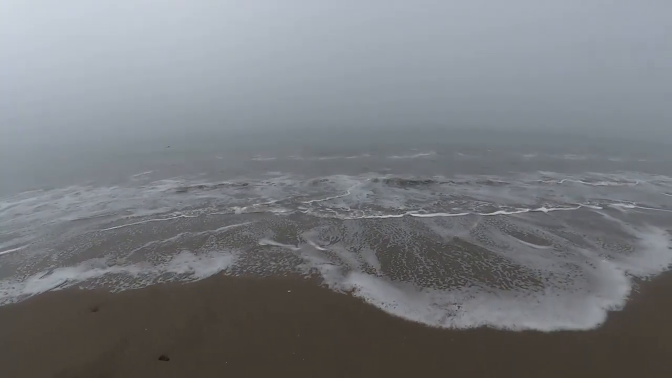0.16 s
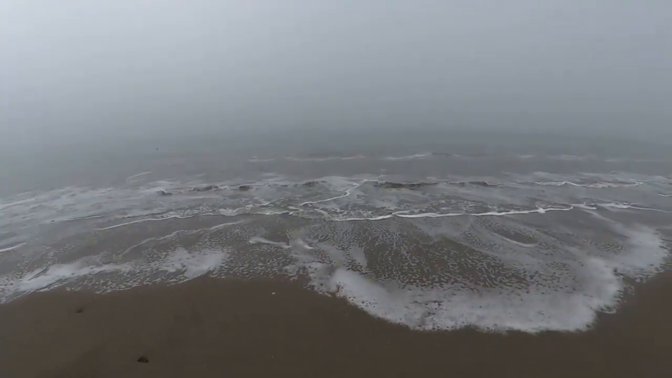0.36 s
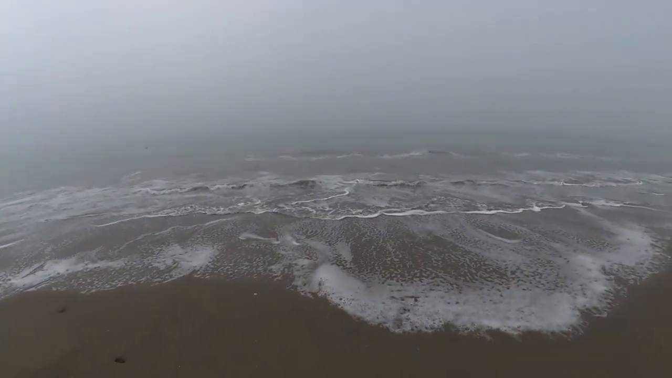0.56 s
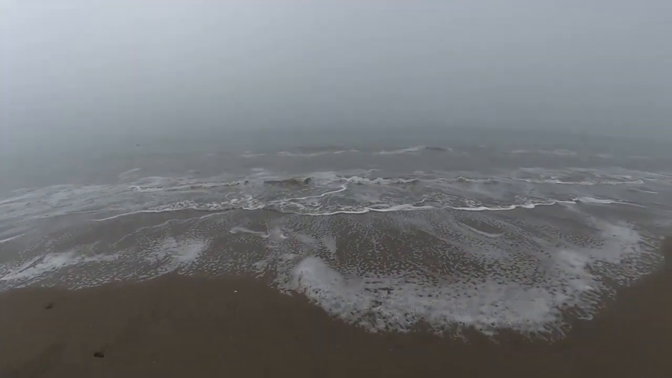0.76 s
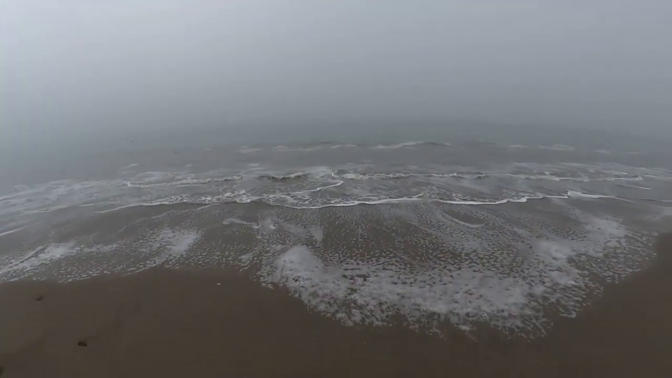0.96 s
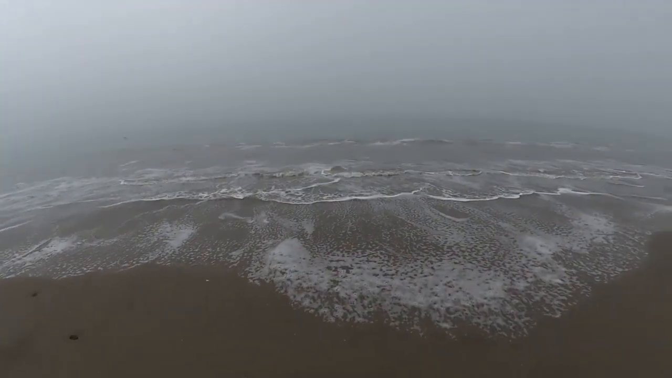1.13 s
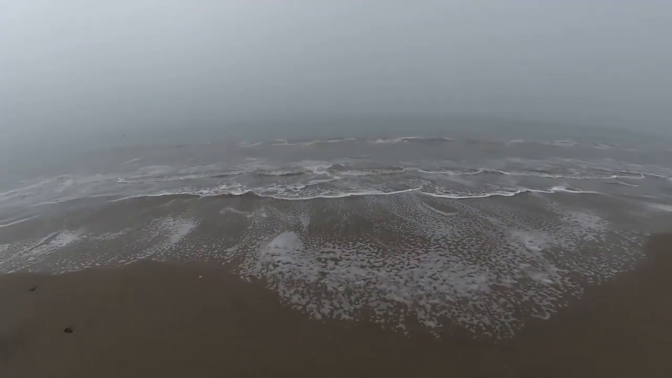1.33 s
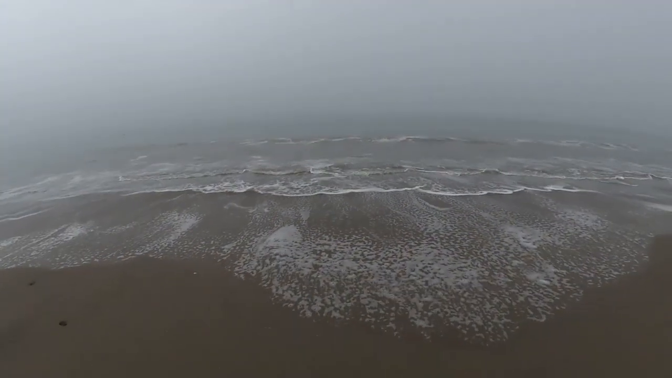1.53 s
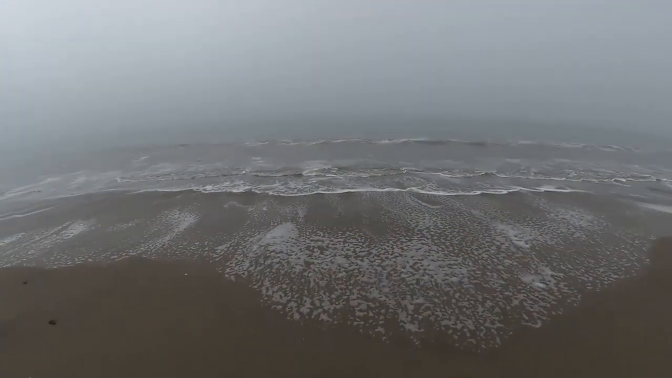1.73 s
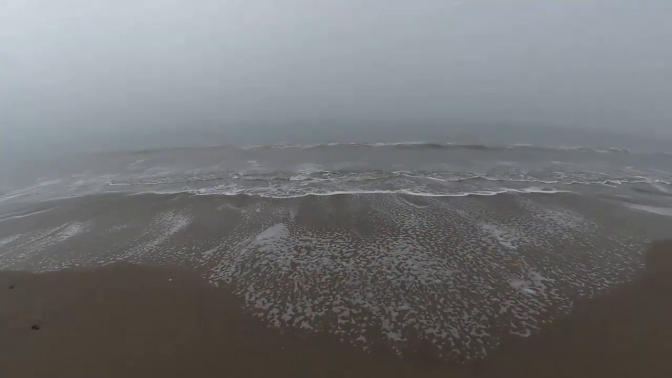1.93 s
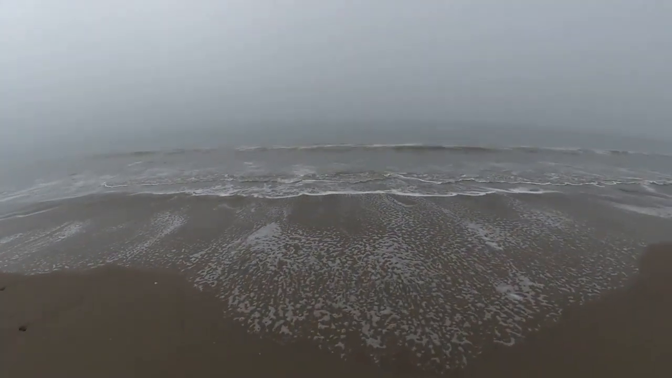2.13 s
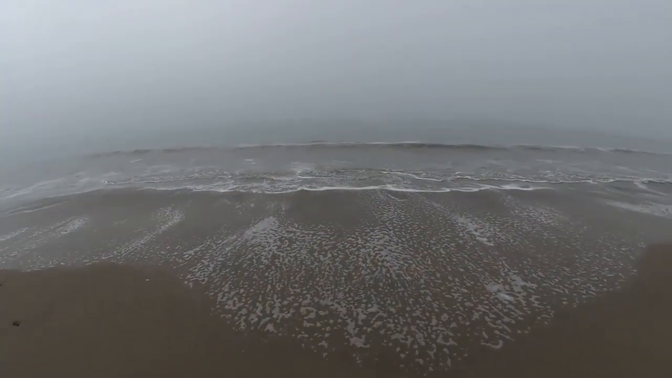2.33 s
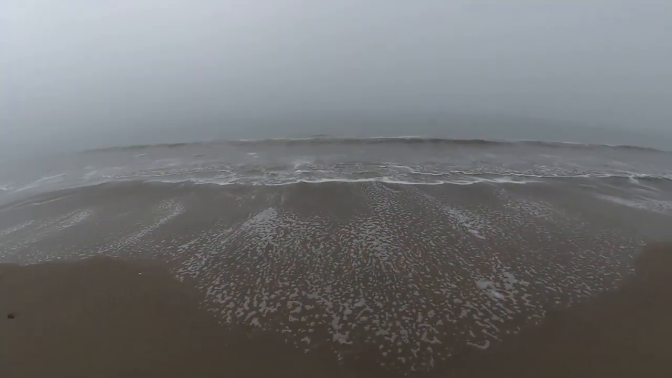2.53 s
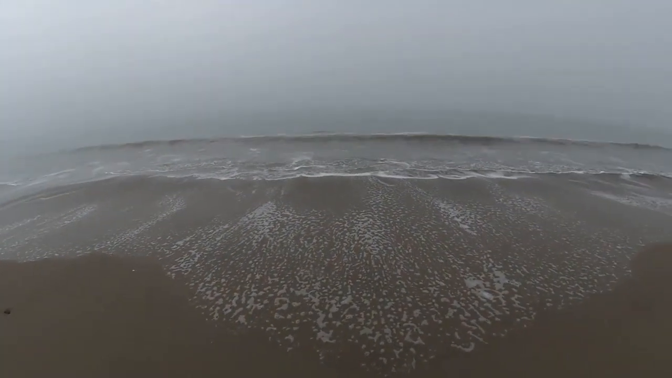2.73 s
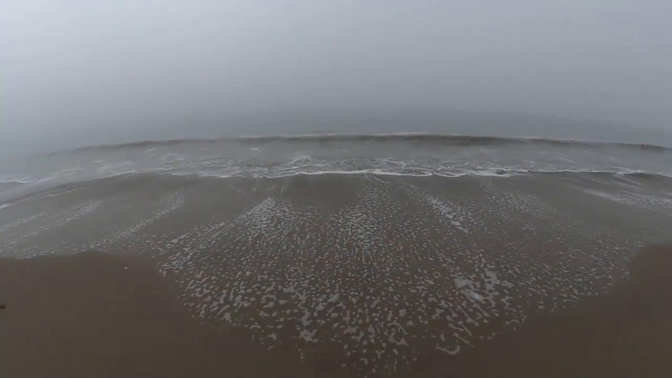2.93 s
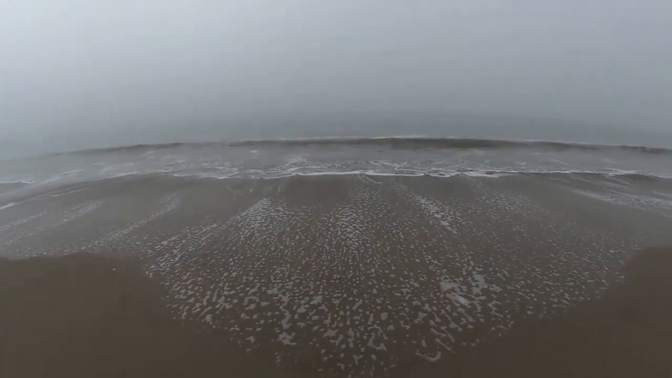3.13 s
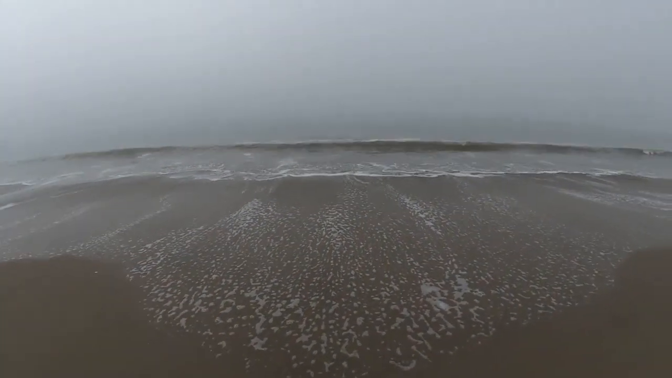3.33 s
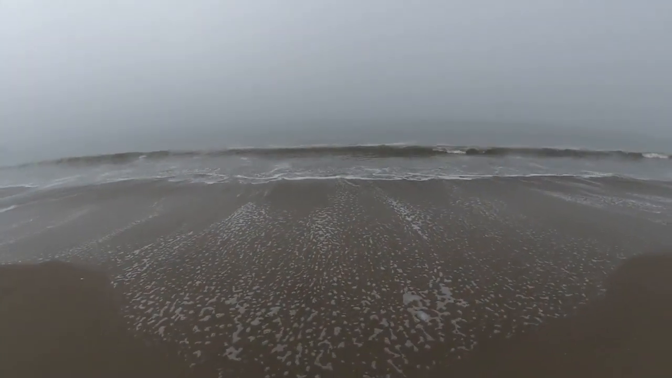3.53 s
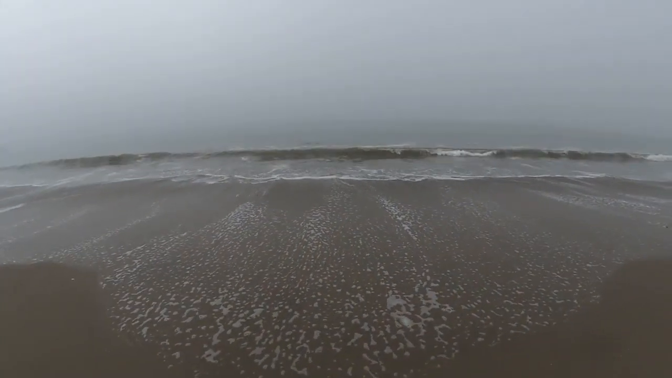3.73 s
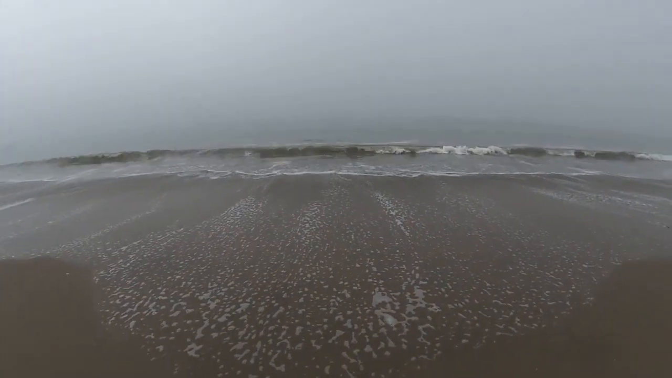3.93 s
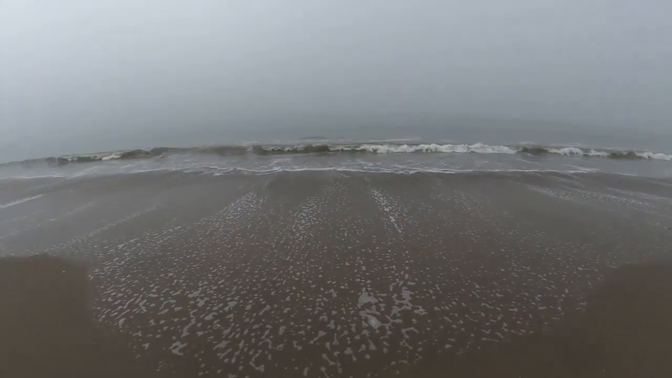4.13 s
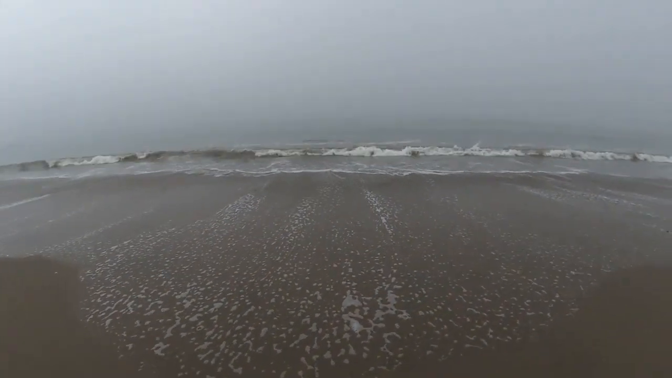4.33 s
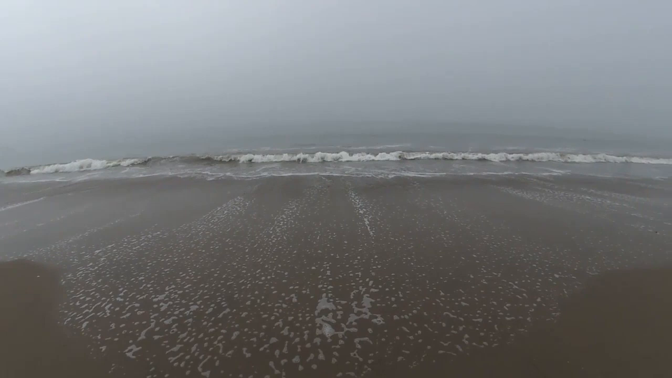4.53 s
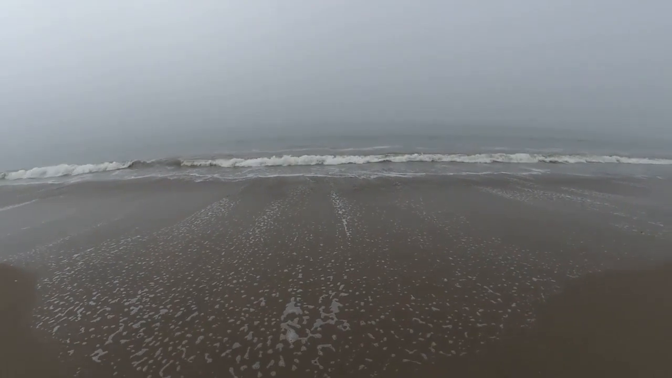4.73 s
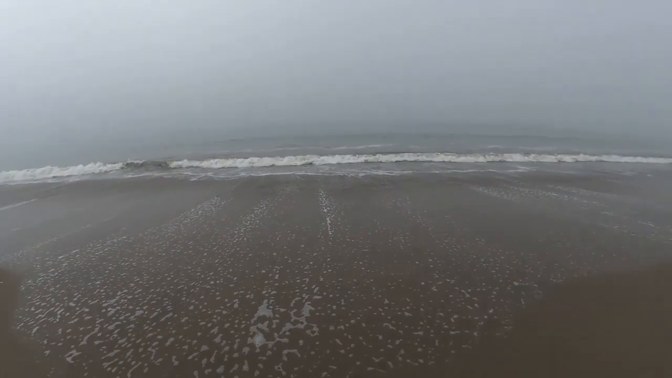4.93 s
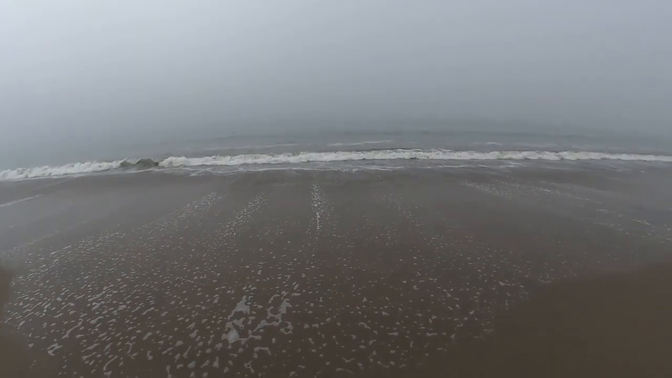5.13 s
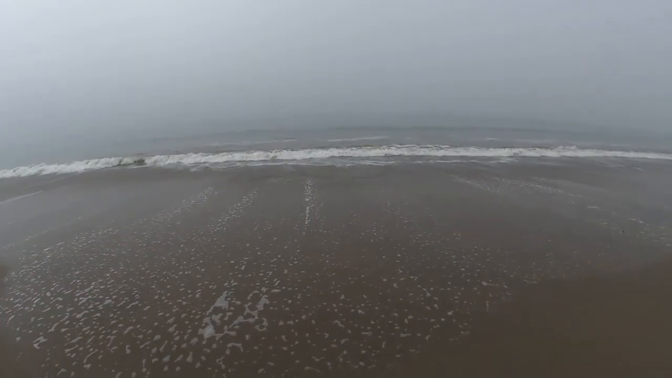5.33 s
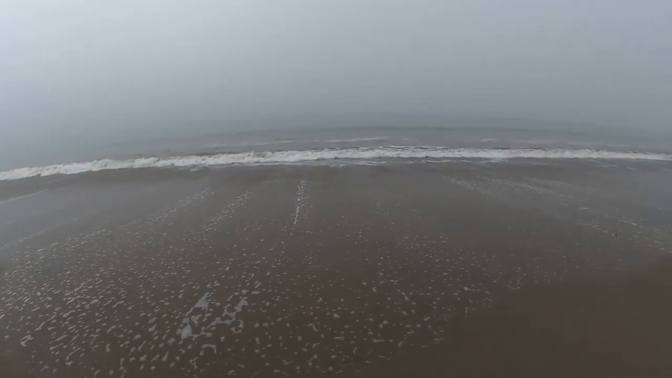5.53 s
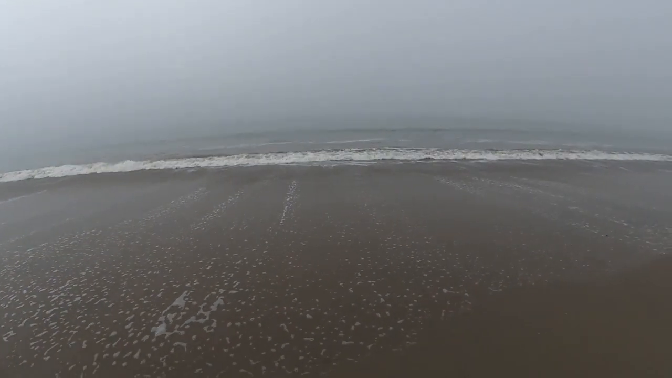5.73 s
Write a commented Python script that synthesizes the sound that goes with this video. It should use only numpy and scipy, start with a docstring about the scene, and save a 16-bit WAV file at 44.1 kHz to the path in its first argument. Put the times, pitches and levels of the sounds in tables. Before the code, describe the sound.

Small waves on an open, foggy sandy beach, heard in stereo from the sand. At 0 s a spent wave is a soft low wash with faint hiss. Around 0.6 to 1.1 s it swells a little: bubbly blips, a low plop at 0.7 s and grainy foam fizz. From 1.3 to 2 s the fizz thins, with tiny ticks and soft thuds; a short wet plop stands out at 2.2 s. By 2.5 to 3.3 s only a quiet low wash, smooth distant surf hiss and light wind rumble on the microphone remain. At 3.35 to 3.7 s crisp splashes, leaning left, start the next wave. It rises quickly to a broad rush by 4.3 s, with bubbly plips, bright dense fizz and deep thumps at about 4.0, 4.4 and 4.6 s. The full, churning roar continues with low booming to nearly 6 s, easing only slightly. The extreme top is dull.

```python
"""Small waves on a sandy beach

A spent wave hisses up the sand and drains, then the next one breaks. Collapsing air pockets thud and
boom, churned water tumbles and rushes, and bursting foam fizzes: shaped noise, partly grained with bubbles.
Single bubbles, splashes and thumps are short gliding rings. Behind them lie the smooth hiss of waves
along the shore and the low rumble of a light wind on the microphone."""
import sys
import numpy as np
from scipy import signal
from scipy.fft import rfft, irfft, next_fast_len
from scipy.io import wavfile
from scipy.ndimage import uniform_filter1d

SR = 44100
rng = np.random.default_rng(int(sys.argv[2]) if len(sys.argv) > 2 else 0)


def wav_out(sig):
    """Save sig, one row per channel (or a flat mono array), as 16-bit PCM at SR to the path in sys.argv[1]."""
    wavfile.write(sys.argv[1], SR, np.round(np.clip(np.atleast_2d(sig).T, -1, 1) * 32767).astype(np.int16))


N = 258426  # samples

# All source levels hold ahead of the microphone's colour.
# Low surf. Each row: time in seconds, thud level in dB, boom level in dB, tumble level in dB.
LOW_SURF_LEVELS = [(0, -38.5, -35, -50), (1.2, -41, -36.5, -52), (2.2, -40, -36.5, -54),
                   (3.0, -45, -37.5, -62), (3.35, -46.5, -42.5, -66), (3.8, -40, -33.5, -60),
                   (4.1, -31, -28.5, -52), (4.6, -31, -26, -36), (4.9, -30.5, -25, -34),
                   (5.15, -33, -25, -33), (5.86, -31, -27, -31)]
# Churning water. Each row: time in seconds, rush level in dB.
RUSH_LEVELS = [(0, -40.5), (.47, -41.5), (.58, -37.5), (.9, -34), (1.8, -39.5), (2.15, -40.5),
               (3.15, -41.5), (3.5, -37.5), (3.62, -32), (4.05, -26.5), (4.3, -24), (5.75, -23.5),
               (5.86, -26)]
# Foam. Each row: time in seconds, coarse fizz level in dB, fine fizz level in dB.
FOAM_LEVELS = [(0, -50.5, -51), (.45, -48, -50.5), (.9, -41.5, -47.5), (1.3, -43.5, -48.5),
               (1.81, -47, -49), (1.95, -49.5, -53), (2.3, -52, -60), (3.26, -52, -70), (3.31, -49.5, -50),
               (3.57, -42, -42), (3.6, -36.5, -39), (4.05, -32.5, -35), (4.25, -32, -32),
               (4.52, -32.5, -31), (4.65, -36, -33.5), (5.86, -34, -37.5)]
# Surges where a pocket of air caves in. Each row: centre in seconds, time from centre to silence in
# seconds, then the peak thud, boom and rush levels in dB, added as power.
SURGES = [(0.734, 0.073, -42, -35, -34), (.93, 0.17, -36, -52, -41), (1.376, 0.13, -38, -37, -55),
          (1.86, 0.076, -34.5, -39, -43), (2.215, 0.053, -41, -39, -40), (2.66, .12, -38, -39, -55),
          (3.2, .06, -45, -40, -53), (3.902, 0.11, -30, -34, -40), (4.26, 0.093, -33, -31, -31),
          (4.57, 0.13, -28, -26, -37), (4.807, 0.093, -45, -27.5, -42), (5.0, .2, -27, -37, -40)]
# Where the water sounds. Each row: time in seconds, left against right in dB and width change in dB
# of the churning water, left against right in dB and width change in dB of the fine foam.
SURF_DIRECTIONS = [(0, -0.5, 0, 1, 5), (.8, 1, -4, -.5, 2), (1.9, -1, .5, 0, -2), (2.7, 0.5, 2, 6, 8),
                   (3.15, 1, 4, -4, 4), (3.5, -1.8, 1.5, -5, -2), (3.9, -1.5, -7.5, -2.4, -2),
                   (4.4, .2, -4, -.5, 0), (5.1, 2.2, -5.5, .3, .3), (5.86, 2.5, -4, 1, 1)]
# Single bubbles, splashes and thumps of trapped air. Each row: centre in seconds, peak level in dB,
# pitch at the centre in Hz, length in cycles, pitch glide as a share of the pitch, left against right in dB.
SINGLE_BUBBLES = [(.587, -26.5, 665, 12, 0.2, 0), (0.57, -24.5, 1340, 4.6, .1, 0),
                  (.733, -21.5, 256, 7.6, 0.029, -4), (.728, -34, 670, 15, -0.14, 0),
                  (1.287, -24, 3400, 3, 0, 0), (1.600, -29, 5000, 3, 0, 0), (1.8, -28, 4500, 3, 0, 0),
                  (1.673, -42, 9000, 4, 0, 0), (1.777, -36, 8000, 3, 0, 0),
                  (2.2071, -18, 740, 2.3, -1.3, -3), (2.2067, -28.5, 3100, 3.3, 0, -5),
                  (3.455, -25, 4300, 2.5, 0, -3.5), (3.480, -23, 7200, 6, 0, -7),
                  (3.478, -26.5, 2500, 7.4, 0, -3), (3.347, -34, 3000, 14, 0, -2),
                  (3.546, -25, 1500, 3.3, 0, -2), (4.4, -26, 1650, 9.2, 0, 0),
                  (3.626, -19, 1650, 5.6, 0, 0), (3.711, -19, 620, 4, -0.58, 0),
                  (3.896, -20.5, 800, 6, -0.28, -2), (4.31, -16.5, 1120, 14, 0.22, 1.5),
                  (4.56, -14, 83, 5.5, -0.093, 0), (4.44, -18, 103, 4.5, 0, 0),
                  (4.035, -17.5, 91, 4.3, 0, 0), (4.255, -19.5, 163, 6.6, -0.12, 0),
                  (4.36, -19, 160, 6, 0, 0), (3.711, -23, 240, 1.8, 0, 0), (2.2066, -27, 1700, 1.8, 0, -3),
                  (.855, -26, 640, 4, 0, 0), (.875, -27, 520, 3, 0, 0), (1.071, -26, 650, 4.5, 0, 0),
                  (.69, -29, 245, 8, -.1, 0), (3.553, -26, 1350, 8, 0, 0), (3.495, -32, 6500, 8, 0, -4)]

# Relative spectra of the layers. Each row: frequency in Hz, density in dB per Hz.
THUD_SPECTRUM = [(25, -33), (55, 3), (95, 5), (125, 3), (200, -32), (600, -95)]
BOOM_SPECTRUM = [(20, -60), (70, -49), (130, 1), (220, 1.5), (330, -5), (450, -14), (800, -39), (2000, -95)]
TUMBLE_SPECTRUM = [(120, -50), (220, -8), (300, 0), (420, -2), (600, -14), (1200, -60)]
RUSH_SPECTRUM = [(100, -70), (250, -27), (380, -10), (480, -6), (650, -1.5), (900, -5), (1350, -5),
                 (2200, -11.5), (3500, -20.5), (7000, -65)]
COARSE_FIZZ_SPECTRUM = [(800, -22), (2000, -5.5), (3200, -4), (5000, -10), (8000, -33), (12000, -70)]
FINE_FIZZ_SPECTRUM = [(2500, -15), (4500, -4), (6500, -1.5), (9000, -3.5), (14500, -14)]
FAR_SURF_SPECTRUM = [(2000, -21), (5000, -6.5), (10000, -3), (14500, -7)]
WIND_SPECTRUM = [(12, -14), (28, -4), (50, -3), (100, -11), (250, -34), (800, -95)]
FAR_SURF_DB, WIND_DB = -47.5, -46

# Microphone in its housing. Each row: frequency in Hz, gain in dB.
MICROPHONE_RESPONSE = [(4800, 0), (5600, -1.5), (6300, 0.5), (7700, -4.5), (8350, -12.5), (8900, -12.5),
                       (10900, -14), (12000, -19), (13200, -19.5), (14200, -27)]
# Difference between the two ports. Each row: frequency in Hz, gain of the diffuse side signal in dB.
PORT_WIDTH = [(25, -13), (60, -24), (150, -49), (300, -48), (500, -30), (950, -41), (1200, -14.5),
              (1600, -9), (4100, -9.5), (7600, -9.5), (8350, 2), (9000, -10), (10900, -2.5), (13400, -8),
              (13600, -35)]
# Only the treble shows a direction. Each row: frequency in Hz, share of the lean from 0 to 1.
TREBLE_LEAN = [(900, 0), (1250, 1)]
BAND_EDGE_HZ = 14180


def surf():
    """Superposition: air pockets, churned water and foam add, the fine foam with a direction of its own."""
    thud_db, boom_db, tumble_db = columns(LOW_SURF_LEVELS)
    rush_db, = columns(RUSH_LEVELS)
    thud_db, boom_db, rush_db = surged([thud_db, boom_db, rush_db])
    water_pan_db, water_width_db, foam_pan_db, foam_width_db = columns(SURF_DIRECTIONS)
    coarse, fine = bursting_foam()
    water = collapsing_air(thud_db, boom_db) + churned_water(tumble_db, rush_db) + coarse
    return placed(water, water_pan_db, water_width_db) + placed(fine, foam_pan_db, foam_width_db)


def collapsing_air(thud_db, boom_db):
    """Cavity collapse: large air pockets caving in radiate low noise, a thud below a boom."""
    thud_noise = churn(patch_db=0.99, patch_hz=150, patch_s=0.04, flicker_db=0.49, flicker_s=0.04)
    boom_noise = churn(patch_db=0.61, patch_hz=150, patch_s=0.08, flicker_db=0.43, flicker_s=0.1)
    return layer(THUD_SPECTRUM, thud_db, thud_noise) + layer(BOOM_SPECTRUM, boom_db, boom_noise)


def churned_water(tumble_db, rush_db):
    """Turbulence: churned water gives a broad rush, grained by bubbles, above a lower tumble."""
    tumble_noise = churn(patch_db=0.9, patch_hz=200, patch_s=0.06, flicker_db=0.4, flicker_s=0.06)
    rush_noise = churn(patch_db=1.0, patch_hz=400, patch_s=0.068, flicker_db=0.2, flicker_s=0.035)
    grains = swarm(lo_hz=301, hi_hz=4090, per_s=900, cycles=4.967, spread_db=3.0)
    tumble = layer(TUMBLE_SPECTRUM, tumble_db, tumble_noise)
    return tumble + layer(RUSH_SPECTRUM, rush_db, rush_noise, grains, grain_share=0.024)


def bursting_foam():
    """Bubble resonance: large foam bubbles fizz coarsely and low, small ones finely and high."""
    coarse_db, fine_db = columns(FOAM_LEVELS)
    coarse_noise = churn(patch_db=1.3, patch_hz=900, patch_s=0.04, flicker_db=0.62, flicker_s=0.04)
    large = swarm(lo_hz=1570, hi_hz=5740, per_s=1500, cycles=3.8, spread_db=3.2)
    fine_noise = churn(patch_db=0.73, patch_hz=1500, patch_s=0.04, flicker_db=0.66, flicker_s=0.04)
    small = swarm(lo_hz=3000, hi_hz=13000, per_s=2000, cycles=4, spread_db=4.2)
    coarse = layer(COARSE_FIZZ_SPECTRUM, coarse_db, coarse_noise, large, grain_share=0.088)
    fine = layer(FINE_FIZZ_SPECTRUM, fine_db, fine_noise, small, grain_share=0.078)
    return coarse, fine


def surged(levels_db):
    """Incoherent addition: each surge adds a smooth swell of power to the thud, boom and rush."""
    t = np.arange(N) / SR
    power = gain_of(levels_db) ** 2
    for centre_s, reach_s, *peaks_db in SURGES:
        phase = np.clip((t - centre_s) / (2 * reach_s), -0.5, 0.5)
        swell = np.cos(np.pi * phase) ** 2
        power = power + (gain_of(peaks_db)[:, None] * swell) ** 2
    return 10 * np.log10(power)


def bubbles():
    """Resonance of trapped air: each single bubble, splash or thump rings about its own time."""
    mid, pan_db = np.zeros((2, N))
    for centre_s, peak_db, hz, cycles, glide, ring_pan_db in SINGLE_BUBBLES:
        ring = gain_of(peak_db) * bubble(hz, cycles, glide)
        start = round(centre_s * SR) - len(ring) // 2
        mid[start:start + len(ring)] += ring
        pan_db[start:start + len(ring)] = ring_pan_db  # where rings overlap, the later row sets the side
    return placed([mid, np.zeros(N)], pan_db, 0)


def bubble(hz, cycles, glide):
    """Frequency modulation: a short cosine glides in pitch under a soft start and end."""
    u = np.linspace(-0.5, 0.5, max(round(cycles / hz * SR), 8))
    ring = np.cos(2 * np.pi * cycles * (u + glide * u ** 2 / 2))
    return ring * np.cos(np.pi * u) ** 2


def swarm(lo_hz, hi_hz, per_s, cycles, spread_db, count=24):
    """Random superposition: bubbles of many pitches, strengths and sides ring at chance times."""
    strength = gain_of(spread_db * np.minimum(rng.exponential(1, N), 3.0))
    strength *= rng.random(N) < per_s / SR
    kind = rng.integers(0, count, N)
    side = rng.standard_normal(N)
    both = np.array([np.ones(N), side])
    out = np.zeros((2, N))
    for k, hz in enumerate(np.geomspace(lo_hz, hi_hz, count)):
        train = strength * (kind == k) * both
        rings = signal.oaconvolve(train, bubble(hz, cycles, glide=0.12)[None], axes=1)[:, :N]
        out += hz * rings  # small bubbles ring briefly but as brightly
    return evened(out)


def churn(patch_db, patch_hz, patch_s, flicker_db, flicker_s):
    """Modulated noise: mid and side share loud patches in time and pitch, and a flicker of all pitches."""
    hop = 128
    frames = N // hop + 5
    a, b, c, d, patches = rng.standard_normal((frames, 257, 5)).T
    patches = uniform_filter1d(patches, max(round(patch_hz * 512 / SR), 1), axis=0)
    patches = evened(uniform_filter1d(patches, max(round(patch_s * SR / hop), 1), axis=1))
    flicker = rng.standard_normal(frames)
    flicker = evened(uniform_filter1d(flicker, max(round(flicker_s * SR / hop), 1)))
    spectra = np.array([a + 1j * b, c + 1j * d])
    spectra = spectra * gain_of(patch_db * patches + flicker_db * flicker)
    return evened(signal.istft(spectra, nperseg=512, noverlap=512 - hop)[1][:, :N])


def layer(spectrum, level_db, noise, grains=0, grain_share=0):
    """Power sharing: noise and bubbles mix by power, take one colour and follow a level curve."""
    mix = np.sqrt(1 - grain_share) * noise + np.sqrt(grain_share) * grains
    return gain_of(level_db) * evened(coloured(mix, spectrum))


def placed(sound, pan_db, width_db):
    """Stereo by level difference: the side is diffuse, and the treble leans to one port."""
    mid, side = sound
    lean = np.tanh(pan_db * np.log(10) / 40)  # side over mid for this left-right ratio
    treble = irfft(rfft(mid) * read(TREBLE_LEAN, np.fft.rfftfreq(N, 1 / SR)), N)
    diffuse = gain_of(width_db) * coloured(side, PORT_WIDTH)
    return np.array([mid, diffuse + lean * treble])


def coloured(x, points):
    """Linear filtering: the spectrum is multiplied by a gain curve in dB."""
    size = next_fast_len(N + 4096)
    gain = gain_of(read(points, np.fft.rfftfreq(size, 1 / SR)))
    return irfft(rfft(x, size) * gain, size)[..., :N]


def read(points, hz):
    """Interpolation along a logarithmic frequency axis."""
    f, value = np.transpose(points)
    return np.interp(np.log(hz + 1), np.log(f + 1), value)


def columns(table):
    """Linear interpolation: each level curve is read at every sample."""
    s, *values = np.transpose(table)
    return [np.interp(np.arange(N) / SR, s, v) for v in values]


def gain_of(db):
    """Decibel law: 20 dB is a tenfold amplitude."""
    return 10 ** (np.asarray(db) / 20)


def evened(x):
    """Normalisation to a root-mean-square of one."""
    return x / np.sqrt(np.mean(x ** 2) + 1e-20)


def far_surf():
    """Averaging of many sources: waves along the shore merge into a smooth hiss of steady level."""
    noise = churn(patch_db=0.8, patch_hz=1500, patch_s=0.1, flicker_db=0.4, flicker_s=0.2)
    return layer(FAR_SURF_SPECTRUM, FAR_SURF_DB, noise)


def wind():
    """Turbulent pressure: moving air gives the microphone a lumpy low rumble."""
    noise = churn(patch_db=0.59, patch_hz=150, patch_s=0.14, flicker_db=0.93, flicker_s=0.52)
    return layer(WIND_SPECTRUM, WIND_DB, noise)


def scene():
    """Sum and difference: mid and side of all sources become left and right."""
    background = placed(far_surf() + wind(), 0, 0)
    mid, side = surf() + bubbles() + background
    return np.array([mid + side, mid - side])


def record(dry):
    """Linear filtering by the microphone's response, then by a steep low-pass band limit."""
    edge = signal.firwin(1023, BAND_EDGE_HZ, window=("kaiser", 9), fs=SR)
    return signal.oaconvolve(coloured(dry, MICROPHONE_RESPONSE), edge[None], "same", axes=1)


dry = scene()
out = record(dry)
wav_out(out)
```